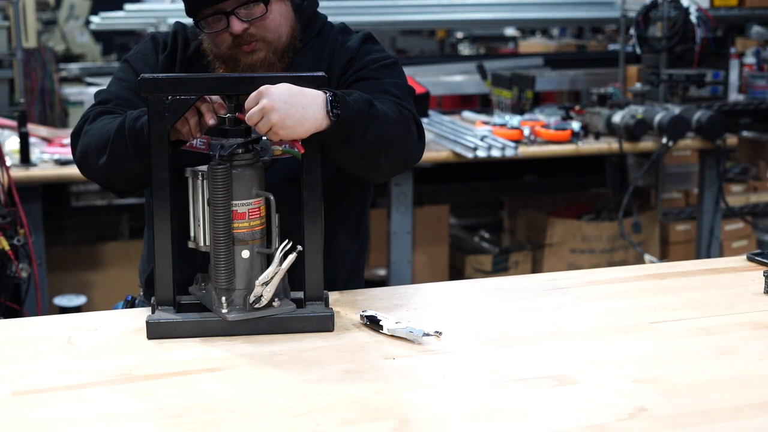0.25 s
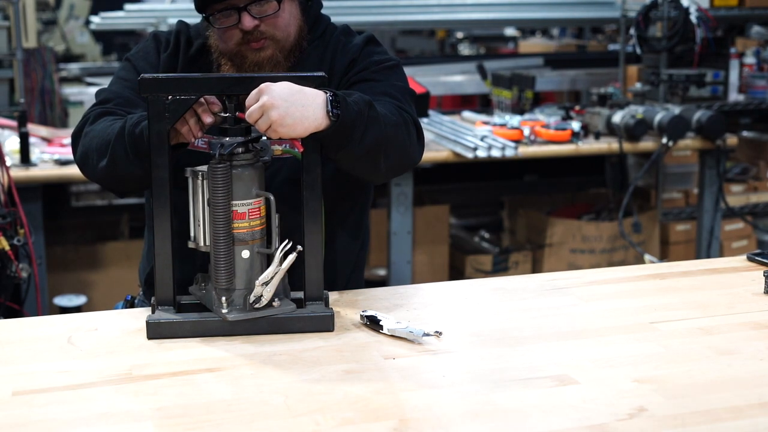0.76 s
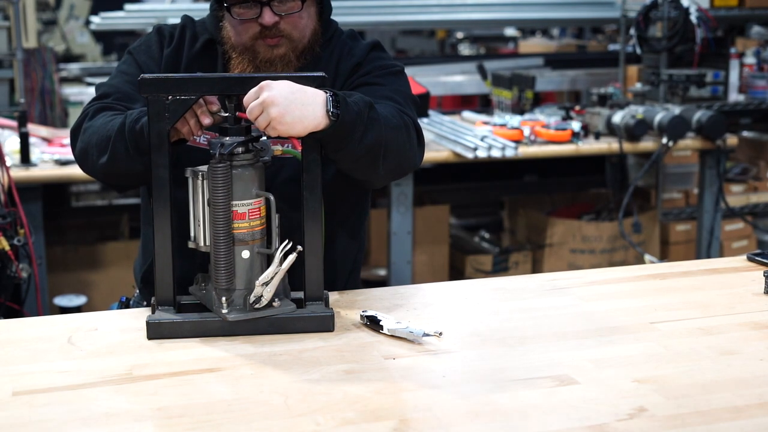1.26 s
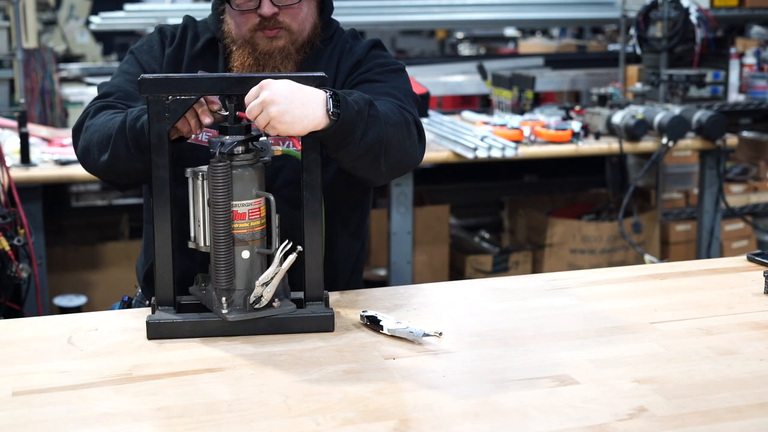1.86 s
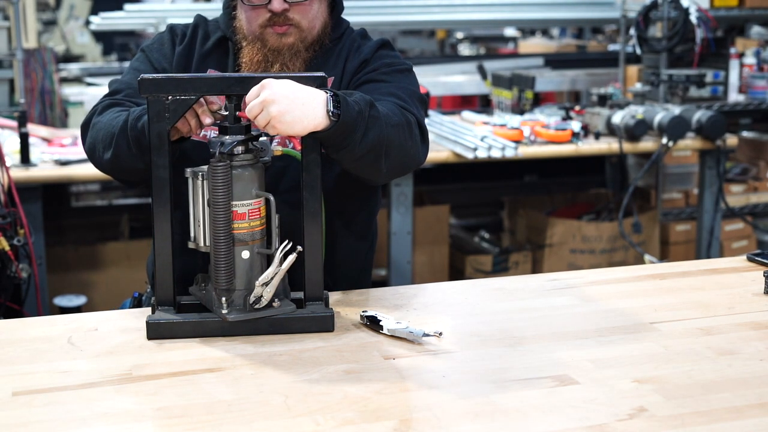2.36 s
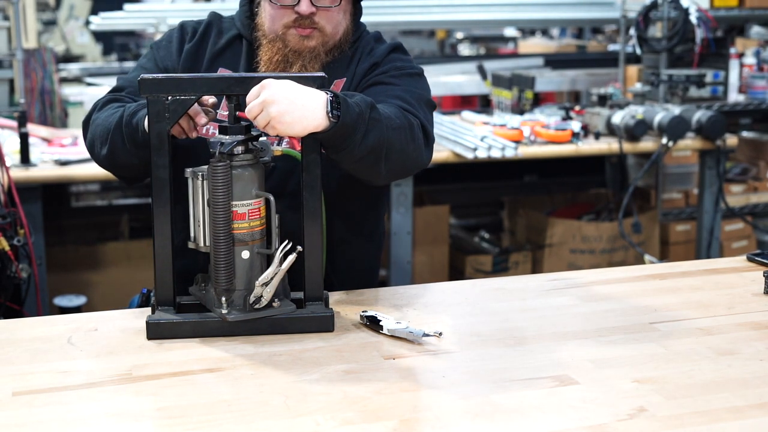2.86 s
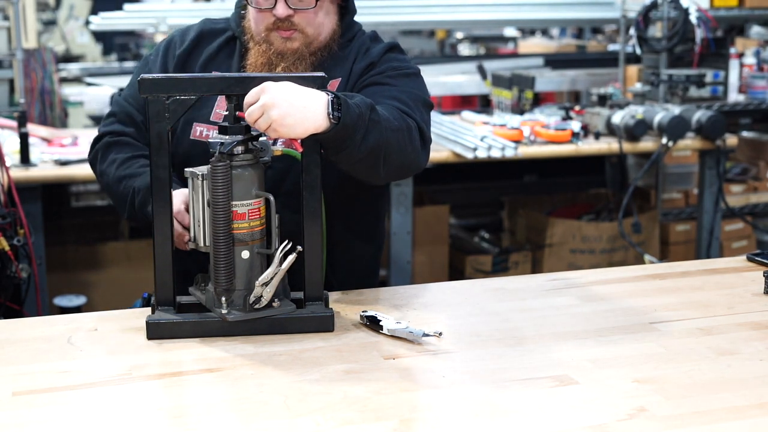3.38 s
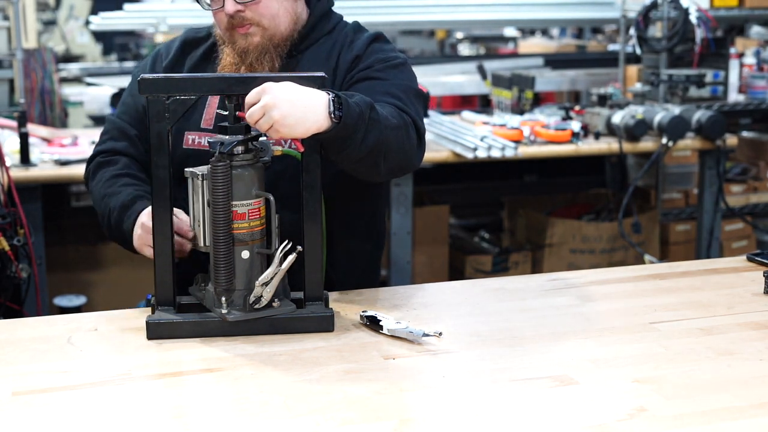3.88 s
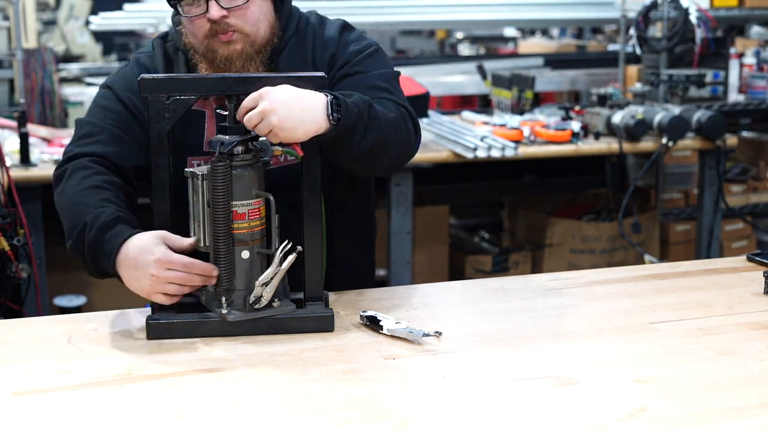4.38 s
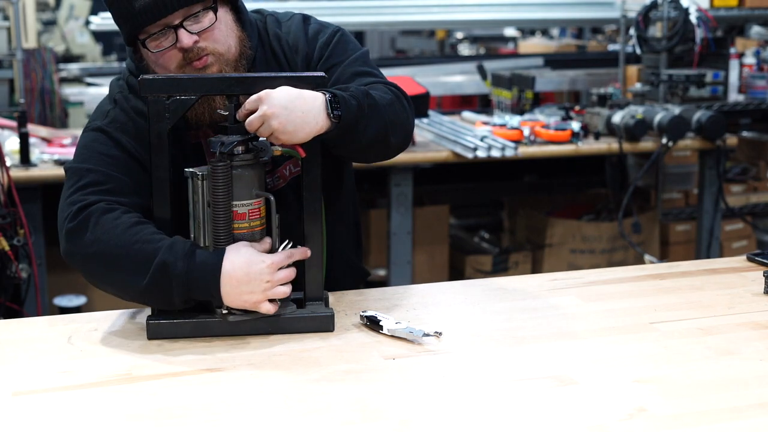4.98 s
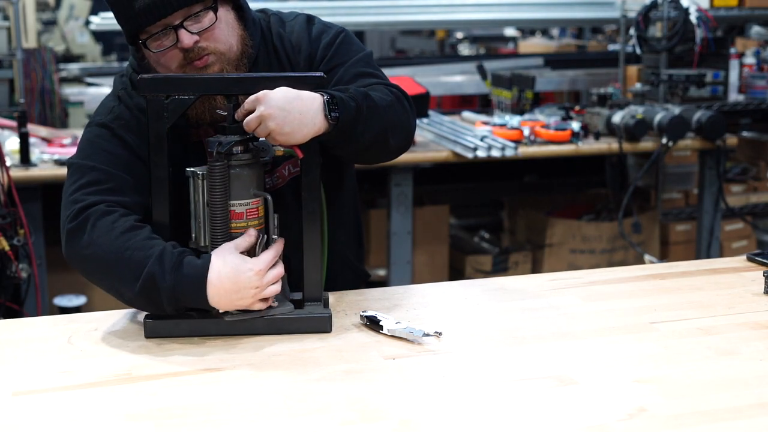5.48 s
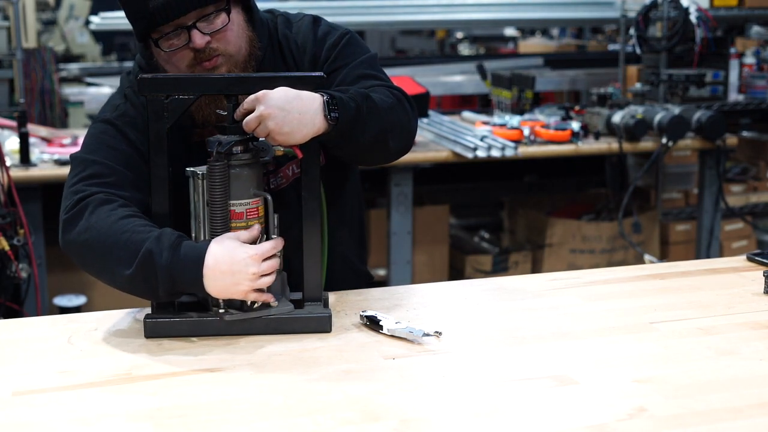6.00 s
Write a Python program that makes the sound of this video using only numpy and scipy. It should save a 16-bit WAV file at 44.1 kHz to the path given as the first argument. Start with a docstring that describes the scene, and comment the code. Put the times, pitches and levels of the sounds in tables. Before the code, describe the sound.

From the start, an air-driven hydraulic jack pumps loudly, about ten strokes a second, each a valve clack, a blast of air and a knock, with light steel ringing and a thin leaking hiss. It stops with a puff at about 0.7 seconds. At 1.2 seconds it restarts, then weakens and slows, stalling by 2.6 seconds with a few dull knocks, a brief squeak and a sharp tick. Near 2.9 seconds the hose empties in a loud, bright hiss that turns hollow and dies by 3.4 seconds, with dull bumps underneath. From about 4 seconds until just past 6, everything is much quieter: a sleeve rustles, fingers rub and tick against steel fittings, pliers clink faintly, and a hand makes soft thuds at the base. The sounds are close, with a short workshop echo and a very faint machine hum.

```python
"""An air-driven hydraulic bottle jack stands in a steel press frame on a wooden workshop bench.
First its air piston pumps ten times a second: each stroke is a valve clack, a blast of air and a knock.
It pauses at 0.7 s, starts again at 1.2 s, then slows and stalls by 2.6 s as the air is eased off.
Near 2.9 s the hose empties with a loud hiss. From about 4 s a hand moves down the jack and works
at its base, with quiet rubs, clinks and thuds."""
import sys
import numpy as np
from scipy import signal
from scipy.fft import rfft, irfft, next_fast_len
from scipy.io import wavfile

SR = 44100
rng = np.random.default_rng(int(sys.argv[2]) if len(sys.argv) > 2 else 0)


def wrap_up_sound(samples):
    """Save the sound to the file named by the first command line argument, as 16-bit audio."""
    columns = np.atleast_2d(samples).T
    # keep every value between -1 and 1, then stretch to whole-number steps
    tamed = np.clip(columns, -1, 1)
    steps = np.round(tamed * 32767).astype(np.int16)
    wavfile.write(sys.argv[1], SR, steps)


N = 275184
T = np.arange(N) / SR  # the time of each sample, in seconds

# the tone of rubbing: pitch_hz, level_db
RUB_TONE = [(200, -1), (600, 1.5), (1000, 0.5), (2200, -0.5), (4000, -2.5), (7000, -16.5), (11000, -12.5),
            (16000, -28.5)]
# the notes the steel fittings ring at: pitch_hz, width_hz, level_db
FITTING_NOTES = [(1010, 37, 4), (1910, 120, 1), (2960, 40, 6), (3190, 69, 2), (3450, 82, 4), (3950, 50, 2),
                 (5300, 200, 1), (6600, 85, 9), (7050, 80, 7), (9000, 900, 2)]
# the hollow tone of air in a pipe: pitch_hz, level_db
PIPE_TONE = [(300, -39), (550, -16), (800, -1), (1300, 1.5), (1700, 2.5), (2100, -9.5), (3500, -36.5)]
# the stalling piston rocks against its stop: start_s, knock_db, ringing_db
STALL_HITS = [(2.1802, -11.5, -16.5), (2.3911, -10.5, -18.5), (2.4326, -9, -20), (2.5509, -16, -14)]


def from_db(db):
    """Turn decibels into a number to multiply by."""
    return 10 ** (np.asarray(db) / 20)


def unit_power(x):
    """Scale a signal to an average power of one."""
    return x / np.sqrt(np.mean(x ** 2) + 1e-20)


def at_hz(points, hz):
    """Read between the rows of a (pitch_hz, value) table, with octaves evenly spaced."""
    pitches, values = np.transpose(points)
    return np.interp(np.log(np.maximum(hz, 1)), np.log(pitches), values)


def cut(x, hz, kind, order=2):
    """Keep the "low" part, the "high" part or a "band" of a sound."""
    sections = signal.butter(order, np.clip(hz, 10, .48 * SR), kind, fs=SR, output="sos")
    return signal.sosfilt(sections, x + 1e-18)


def resonate(x, hz, width_hz):
    """Ring at one pitch; a narrower width rings longer."""
    r = np.exp(-np.pi * width_hz / SR)
    feedback = [1, -2 * r * np.cos(2 * np.pi * hz / SR), r * r]
    return signal.lfilter(np.array([1, 0, -1]) * (1 - r * r) / 2, feedback, x + 1e-18)


def noise(tone):
    """Noise shaped by rows of pitch_hz, level_db."""
    size = next_fast_len(N, True)
    gain = from_db(at_hz(tone, np.fft.rfftfreq(size, 1 / SR)))
    return unit_power(irfft(rfft(rng.standard_normal(size)) * gain, size)[:N])


def wander(rate_hz):
    """A smooth random drift around zero."""
    return unit_power(cut(rng.standard_normal(N), rate_hz, "low"))


def flutter(rate_hz, depth_db):
    """A random wobble in loudness."""
    return unit_power(from_db(depth_db * wander(rate_hz)))


def whistle(hz, width_hz):
    """A swirling flow ringing at one pitch."""
    return unit_power(resonate(resonate(rng.standard_normal(N), hz, width_hz), hz, width_hz))


def howl(hz, width_hz):
    """A rough note whose pitch drifts by about 5%."""
    pitch = hz * (1 + .05 * wander(rate_hz=15))
    rough = cut(rng.standard_normal(N) + 1j * rng.standard_normal(N), width_hz / 2, "low")
    return unit_power(np.real(rough * np.exp(2j * np.pi * np.cumsum(pitch) / SR)))


def gate(start, end, rise_s, fall_s):
    """Fade in from start, die away after end."""
    return (1 - np.exp(-np.maximum(T - start, 0) / rise_s)) * np.exp(-np.clip((T - end) / fall_s, 0, 20))


def sag(start, db_per_s):
    """A level that sinks steadily from start."""
    return from_db(-db_per_s * np.maximum(T - start, 0))


def clicks(rows):
    """One spike for each row of start_s, level_db."""
    s, db = np.transpose(rows)
    return np.bincount(np.clip(np.round(s * SR).astype(int), 0, N - 1), from_db(db), N)


def blows(rows, notes, order=3):
    """Hits (start_s, level_db, brightness_hz) on a body that rings briefly at its notes."""
    out = np.zeros(N + SR)
    for s, level_db, brightness_hz in rows:
        contact = cut(signal.unit_impulse(SR // 10), brightness_hz, "low", order=order)
        shape = sum(from_db(db) * resonate(contact, hz, width) for hz, width, db in notes)
        at = max(round(s * SR), 0)
        out[at:at + len(shape)] -= from_db(level_db) * shape / np.abs(shape).max()
    return out[:N]


def ringing(force, notes):
    """Every hit rings each note with slightly different strength; it fades 60 dB in ring_s."""
    out, at = 0, np.flatnonzero(force)
    for hz, db, ring_s in notes:
        r, turn = from_db(-60 / (ring_s * SR)), 2 * np.pi * hz / SR
        push = np.zeros(N)
        push[at] = force[at] * from_db(db + .84 * rng.standard_normal(len(at)))
        out = out + signal.lfilter([0, np.sin(turn)], [1, -2 * r * np.cos(turn), r * r], push + 1e-18)
    return out


def shop():
    """Faint workshop noise and machine hum, sinking towards the end."""
    # the tone of the background: pitch_hz, level_db
    tone = [(15, -44.5), (25, -27), (92, -13), (153, -2.5), (217, -6.5), (451, -6), (734, -17.5),
            (1130, -11.5), (1260, -19.5), (1520, -19), (1790, -19.5), (9320, -35), (16000, -49.5)]
    # humming machines: pitch_hz, level_db
    notes = [(150.7, -76), (543.7, -81), (1071, -80), (1222, -88)]
    hum = sum(from_db(db) * np.sqrt(2) * np.sin(2 * np.pi * hz * T) * flutter(rate_hz=5, depth_db=2.5)
              for hz, db in notes)
    return (from_db(-67) * noise(tone) + hum) * from_db(np.interp(T, [4.7, 5.9], [1, -7]))


def room(x, build_s):
    """The workshop's echoes build up, then each octave dies away at its own speed."""
    # how long echoes take to fade by 60 dB: pitch_hz, fade_s
    fade_times = [(100, 0.58), (500, 0.26), (2000, 0.41), (6000, 0.72), (10000, 0.11), (16000, 0.23)]
    t, tail = T[:SR], 0
    edges = np.geomspace(40, 20000, 10)
    for low, high in zip(edges, edges[1:]):
        fade_s = at_hz(fade_times, np.sqrt(low * high))
        tail = tail + cut(rng.standard_normal(SR), [low, high], "band") * from_db(-60 * t / fade_s)
    tail = tail * (1 - np.exp(-(t / build_s) ** 2))
    return signal.fftconvolve(x, tail / np.sqrt(np.sum(tail ** 2)))[:N]


def near_echoes(x):
    """Very quick echoes of the treble make a hiss sound metallic."""
    # echoes off the frame and bench: delay_s, level_db
    echoes = [(.0009, -23), (.0023, -17.5), (.0041, -15.5)]
    treble = cut(x, 2200, "high")
    return x + sum(from_db(db) * np.interp(T - delay, T, treble, left=0) for delay, db in echoes)


def arm():
    """A sleeve rustles along the jack, and the bench rumbles under the arm."""
    # sleeve sweeps that swell and fade: loudest_s, level_db, fade_db_per_s
    sweeps = [(3.9, -69, 100), (4.45, -52.5, 120), (4.5, -68, 28)]
    swell = sum(from_db(db - fade * np.abs(T - s)) for s, db, fade in sweeps)
    sleeve = swell * noise(RUB_TONE) * flutter(rate_hz=270, depth_db=3.5)
    rumble = noise([(25, -5), (75, -.5), (130, -10), (400, -14.5), (900, -52.5)])
    return sleeve + from_db(-48.5) * gate(5.33, 5.385, .0049, .012) * rumble


def steel(scrape):
    """Some of the scrape itself, plus the fittings ringing on after it."""
    return .55 * scrape + sum(from_db(db) * resonate(scrape, hz, width) for hz, width, db in FITTING_NOTES)


def rubbing():
    """The hand rubs and turns the gritty steel fittings."""
    # each rub: start_s, length_s, level_db, brightness_hz
    rubs = [(4.395, 0.075, -44, 7500), (5.07, 0.066, -53.5, 14000), (5.275, 0.023, -51.5, 9080),
            (5.307, 0.023, -56, 14000), (5.465, 0.01, -56, 2500), (5.489, 0.056, -51.5, 2400),
            (6.09, 0.006, -45, 1800)]
    grit = noise(RUB_TONE) * flutter(rate_hz=100, depth_db=2)
    grit = grit / np.std(steel(grit))
    return steel(sum(from_db(db) * gate(s, s + length, .0054, .0096) * cut(grit, hz, "low", order=1)
                     for s, length, db, hz in rubs))


def ticks_and_clinks():
    """The metal fittings tick under the fingers and clink against pliers."""
    # sharp ticks: start_s, level_db
    sharp = [(2.245, -42), (2.5828, -19), (2.6235, -36), (4.409, -27), (4.428, -28), (4.437, -29),
             (4.470, -35), (4.8145, -49), (5.307, -47)]
    # spells of faint, uneven ticking: start_s, end_s, level_db
    spells = [(2.57, 2.72, -44.5), (3.88, 4, -55), (4.33, 4.56, -48)]
    # pliers meet fittings: start_s, level_db, brightness_hz
    clinks = [(4.43, -34.5, 2980), (4.642, -42, 5500), (4.8145, -57.5, 2500), (4.838, -52.5, 2000),
              (5.284, -41, 7000), (5.467, -54, 1800), (5.503, -40.5, 1787), (6.094, -42, 1450)]
    crack = cut(rng.standard_normal(SR // 50), [2200, 8000], "band") * np.exp(-T[:SR // 50] / .00054)
    gap_s = .03
    faint = [(s + gap_s * rng.uniform(-.5, .5), db + rng.normal(0, 2.5))
             for start, end, db in spells for s in np.arange(start, end, gap_s)]
    ticks = signal.oaconvolve(clicks(sharp + faint), crack / np.abs(crack).max())[:N]
    return ticks + blows(clinks, FITTING_NOTES, order=5)


def thuds():
    """The hand works at the base: soft, crumbly pushes that fall in pitch."""
    # each push: start_s, level_db
    pushes = [(4.719, -38.5), (4.854, -52.5), (5.221, -57.5), (5.524, -49.5), (5.672, -58.5), (5.82, -60.5),
              (5.972, -55), (6.099, -41.5)]
    t, start_hz, end_hz, sink_s = T[:SR // 10], 540, 75, .013
    pitch = end_hz + (start_hz - end_hz) * np.exp(-t / sink_s)
    shape = np.sin(2 * np.pi * np.cumsum(pitch) / SR) * t * np.exp(-t / .0066)
    thumps = signal.oaconvolve(clicks(pushes), shape / np.abs(shape).max())[:N]
    swell = sum(from_db(db) * gate(s, s + .016, .0059, .016) for s, db in pushes)
    crumble = swell * noise([(40, -18), (120, 5.5), (330, -.5), (520, -4), (900, -35.5), (4000, -65)])
    return from_db(-1.5) * thumps + from_db(-7.5) * crumble


def bumps():
    """Hand and hose bump dully against the frame and bench."""
    # each bump: start_s, level_db
    hits = [(2.162, -26), (3.083, -14.5), (3.095, -13), (3.233, -29.5), (4.369, -42)]
    dull = blows([(s, db, 560) for s, db in hits], notes=[(162.7, 54, -6), (273, 120, 0)])
    return cut(dull, 140, "high", order=3)


def escaping_air(tone, flow, full_db, top_hz, rough_db):
    """A jet of air; its hiss above top_hz fades first once the flow sinks below full_db."""
    hiss = noise(tone) * flutter(rate_hz=340, depth_db=rough_db)
    dull = signal.sosfiltfilt(signal.butter(4, top_hz, fs=SR, output="sos"), hiss)
    pressure = np.minimum(flow / from_db(full_db), 1)
    return flow * (dull + pressure * (hiss - dull))


def leak():
    """Air hisses past the motor while the throttle is held; spare air leaves in duller, hollow puffs."""
    # the tone of the leak: pitch_hz, level_db
    tone = [(200, -7), (600, -8.5), (900, 2), (1600, 2.5), (2400, -3.5), (5000, -4), (9000, -3.5),
            (12000, -10.5), (16000, -7)]
    # the throttle is held open: start_s, end_s, fade_s
    presses = [(-.05, .72, .016), (1.127, 1.52, .25)]
    # puffs as the first run ends: start_s, end_s, level_db
    spare_air = [(.671, .712, -20), (.74, .795, -26.5)]
    held = sum(gate(start, end, .012, fade_s) * sag(start, db_per_s=3) for start, end, fade_s in presses)
    held = from_db(-33.8) * held * sag(1.93, db_per_s=55)  # the throttle shuts
    puffs = sum(from_db(db) * gate(start, end, .012, .02) for start, end, db in spare_air)
    hiss = escaping_air(tone, held, full_db=-37.5, top_hz=9500, rough_db=2.5)
    puff_hiss = escaping_air(tone, puffs, full_db=-12, top_hz=9000, rough_db=2.5)
    return hiss + puff_hiss + from_db(-5) * puffs * noise(PIPE_TONE)


def vent():
    """The hose empties in one bright jet that turns hollow as the pressure sinks."""
    # the tone of the jet: pitch_hz, level_db
    tone = [(300, -47.5), (600, -25.5), (830, -7.5), (1130, -3.5), (1530, -1), (2180, -9), (2750, 2),
            (3200, 0), (4240, 2), (8100, 2.1), (12000, -2), (16000, -10)]
    opens_s, empty_s, shut_s = 2.869, 3.225, 3.36
    opening = 1 - np.exp(-(np.maximum(T - opens_s, 0) / .02) ** 2)
    flow = from_db(-12) * opening * gate(opens_s, empty_s, .003, .078)
    flow = flow * sag(opens_s, db_per_s=38) * sag(shut_s, db_per_s=200)
    pipe = from_db(-23.6) * opening * gate(opens_s, empty_s + .012, rise_s=.11, fall_s=.024)
    jet = escaping_air(tone, flow, full_db=-13, top_hz=9000, rough_db=1.1)
    return jet + pipe * noise(PIPE_TONE) * flutter(rate_hz=200, depth_db=2.2)


def strokes():
    """For each piston stroke: opens_s, lands_s, drive_db and how much the valve sticks (0 to 1)."""
    # the valve lets air in: start_s, drive_db (0 is full pressure, less is weaker)
    openings = [(.035, 0), (.127, 0), (.219, 0), (.312, -.1), (.405, -.1), (.4995, -1.0), (.595, 0),
                (.694, -.2), (1.2, -1.8), (1.295, 0), (1.394, -.6), (1.4944, -3), (1.5965, -4), (1.699, -6),
                (1.803, -7), (1.919, -11.5), (2.054, -13), (2.283, -15)]
    travel_s, shortens_s_per_db, stuck_db = .030, .00058, -3
    return [(s, s + travel_s + shortens_s_per_db * drive, drive, np.clip(drive / stuck_db, 0, 1))
            for s, drive in openings]


def oil_valve():
    """The one-way oil valve sings after each stroke, higher under load, and squeaks at the stall."""
    # the squeak: pitch_hz, width_hz, level_db
    squeak_notes = [(2072, 340, -44), (3280, 1200, -42.5), (4400, 260, -40), (7630, 1100, -63),
                    (11350, 970, -60)]
    # points the song glides between: time_s, pitch_hz, level_db
    song_path = [(.07, 660, -21.5), (.16, 645, -21.5), (.4, 660, -38), (1.3, 1140, -38), (1.55, 1150, -30),
                 (2.32, 1167, -31)]
    squeak = sum(from_db(db) * whistle(hz, width) for hz, width, db in squeak_notes)
    times, pitches, levels = np.transpose(song_path)
    squirts = sum(gate(lands + .009, lands + .02, .003, .0079) for _, lands, *_ in strokes())
    pitch = np.interp(T, times, pitches) * (1 + .055 * wander(rate_hz=150))
    song = unit_power(np.sin(2 * np.pi * np.cumsum(pitch) / SR)) * flutter(rate_hz=120, depth_db=3)
    return gate(2.392, 2.445, .016, .01) * squeak + from_db(np.interp(T, times, levels)) * squirts * song


def shudder():
    """The sliding piston shakes the jack; its return drags longer and grinds more as the air weakens."""
    # the tone of the shaking: pitch_hz, level_db
    tone = [(40, -21.5), (95, -1.5), (140, 5.5), (200, -4.5), (265, 3), (400, -10), (560, -6.5), (750, -14),
            (1100, -14.5), (2000, -24), (3500, -49)]
    forward = back = 0
    for opens, lands, drive, _ in strokes():
        forward += from_db(-28.5 + .25 * drive) * gate(opens, lands + .02, .004, .011)
        return_s = .04 - .0052 * drive
        back += from_db(-38 - .3 * drive) * gate(lands, lands + return_s, .01, .008) * sag(lands, 50)
    return (forward + back) * noise(tone) * flutter(rate_hz=120, depth_db=2)


def stall_knocks():
    """The stalling piston hits its stop and bounces once: dull double knocks."""
    # the hollow, emptying cylinder: pitch_hz, width_hz, level_db
    notes = [(146, 44, 11), (275, 90, 7.5), (358, 90, 1), (540, 120, -4.5), (1020, 99, -5.5),
             (1900, 600, -20.5), (3100, 400, -20)]
    hits = [(s, db, 2600) for s, db, _ in STALL_HITS]
    bounces = [(s + .007, db - 7, hz) for s, db, hz in hits]
    return blows(hits + bounces, notes, order=6)


def stall_ringing():
    """The stalling piston sets the valve body ringing."""
    # the valve body: pitch_hz, level_db, ring_s
    notes = [(172, -25, .55), (490, -20, 0.2), (1070, -24, .06), (1200, -20, .17), (1950, -33, .06),
             (3000, -28.5, .06)]
    force = clicks([(s, ringing_db) for s, _, ringing_db in STALL_HITS])
    return cut(ringing(force, notes), 3500, "low", order=3)


def frame_ringing(landings):
    """The steel rings and rattles, almost as much after a weak stroke as after a strong one."""
    # jack, frame and bench: pitch_hz, level_db, ring_s
    notes = [(86, -40, 0.14), (156, -28.3, .22), (261, -29.3, .15), (348, -40.5, .1), (499, -34, .14),
             (520, -39.5, 0.12), (1109, -42.5, 0.42), (1685, -47.5, 0.14), (2040, -33, 0.21)]
    return ringing(clicks(landings) ** .08, notes) * flutter(rate_hz=60, depth_db=1.5)


def air_valve():
    """A clack just before each blast; a sticking valve starts earlier and softer, then clacks home."""
    # the valve's housing: pitch_hz, width_hz, level_db
    notes = [(305, 270, -2), (549.2, 680, 5.5), (1003, 1500, -13.5), (1900, 2700, -11), (3200, 900, -30)]
    hits = [(1.198, 5.5, 1250)]  # the first throw from rest, as the second run starts
    for opens, _, drive, stick in strokes():
        free = np.array([opens - .0035, -12, 600])
        stuck = np.array([opens - .008, -20 + .2 * drive, 820])
        home = (opens, -8 + .65 * drive - 9 * (1 - stick), 1300)
        hits += [free + stick * (stuck - free), home]
    return blows(hits, notes)


def exhaust():
    """Air puffs and blows out until the piston lands; a hard blast also honks and spits."""
    # the tone of the blast: pitch_hz, level_db
    tone = [(30, -19), (110, -1), (300, -5), (650, -7.5), (1000, 0.5), (1900, -5), (2400, -9), (3700, -5),
            (4300, -10), (7000, -7.5), (12000, -19.5), (16000, -27.5)]
    # the air outlet's honk: pitch_hz, width_hz, level_db
    notes = [(1741, 330, 9.7), (3720, 200, -1), (5600, 300, -5), (7400, 300, -4.5)]
    snap_db, stick_loss_db = 3, 12  # a free valve snaps open; a sticking one chokes the blast
    flow, puff = np.zeros(N), np.zeros(N)
    for opens, lands, drive, stick in strokes():
        land_db = -14.8 + .7 * drive
        open_db = land_db + snap_db - stick_loss_db * stick
        strength = from_db(np.interp(T, [opens, lands - .006], [open_db, land_db]))
        flow += strength * gate(opens - .0005, lands, rise_s=.0012, fall_s=.001 + .0015 * abs(drive))
        puff += from_db(open_db) * gate(opens, opens + .0066, .0023, .0012)
    jet = flow * flutter(rate_hz=220, depth_db=1.9) * noise(tone)
    spit = flow ** 2 * noise([(4000, -22), (8000, -3.5), (11000, -1.5), (16000, 0)])
    honk = flow ** 2 * sum(from_db(db) * howl(hz, width) for hz, width, db in notes)
    puff *= noise([(40, -11), (110, -3), (300, 2), (500, 0), (900, -30)])
    return from_db(-2.8) * jet + from_db(3.5) * spit + honk + from_db(1.5) * puff


def piston_knocks(landings):
    """The piston knocks in its casing at the end of each stroke."""
    # the casing: pitch_hz, width_hz, level_db
    notes = [(200, 390, 1.5), (455, 120, -1.5)]
    return blows([(s, db, 690) for s, db in landings], notes, order=4)


def scene():
    """Mix the jack, the air and the hands with the workshop's echoes and background."""
    landings = [(lands, 2.5 + 1.32 * drive) for _, lands, drive, _ in strokes()]  # start_s, level_db
    rings = frame_ringing(landings) + stall_ringing()
    knocks = piston_knocks(landings) + air_valve() + stall_knocks() + bumps()
    blast = near_echoes(exhaust()) + oil_valve() + shudder()
    hiss = near_echoes(leak() + vent())
    hands = thuds() + rubbing() + ticks_and_clinks() + arm()
    into_room = from_db(-15.5) * (knocks + hands) + from_db(-22.5) * blast + from_db(-11.5) * hiss
    return (knocks + rings + blast + hiss + hands + room(into_room, build_s=.0019) + shop())[None]


def record(dry):
    """Thin the deepest bass, round off the loudest peaks and cut the highest treble."""
    ceiling, top_hz = .97, 16000
    rounded = ceiling * np.tanh(cut(dry, 52, "high", order=1) / ceiling)
    return signal.sosfilt(signal.ellip(10, .1, 80, top_hz, fs=SR, output="sos"), rounded)


dry = scene()
out = record(dry)
wrap_up_sound(out)
```